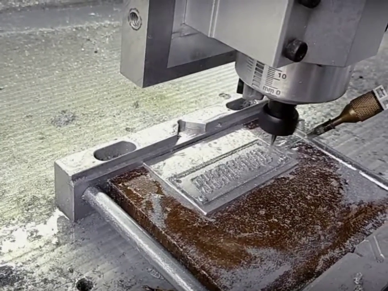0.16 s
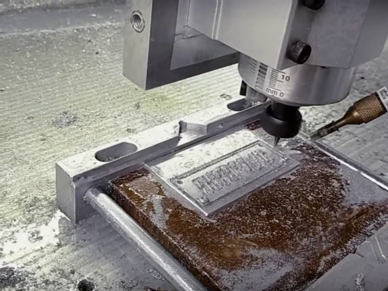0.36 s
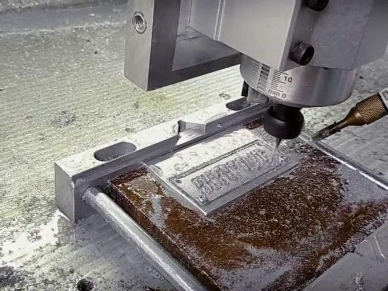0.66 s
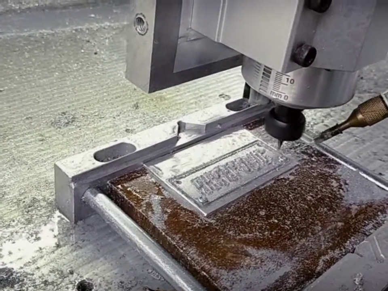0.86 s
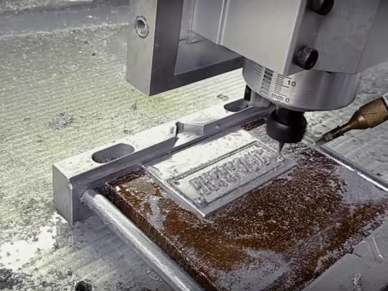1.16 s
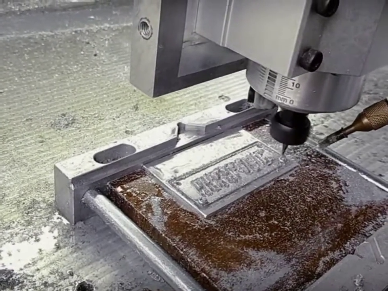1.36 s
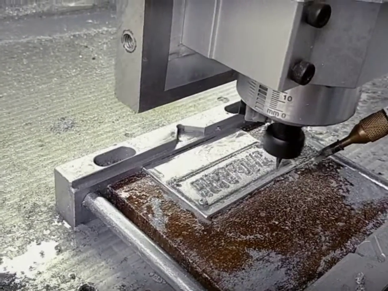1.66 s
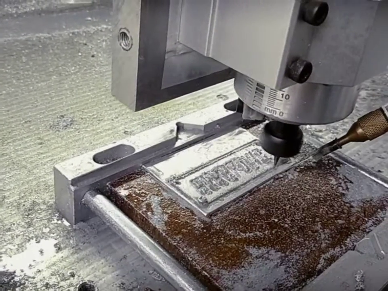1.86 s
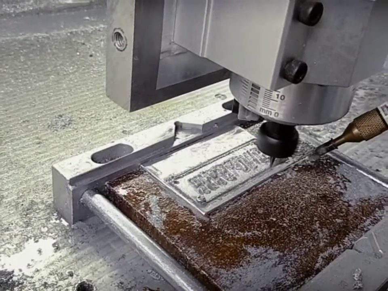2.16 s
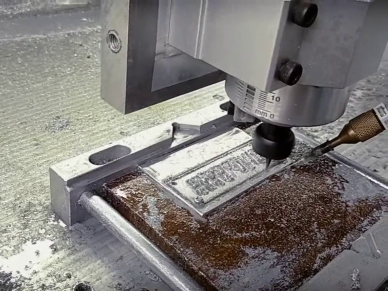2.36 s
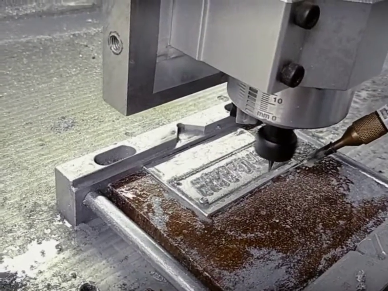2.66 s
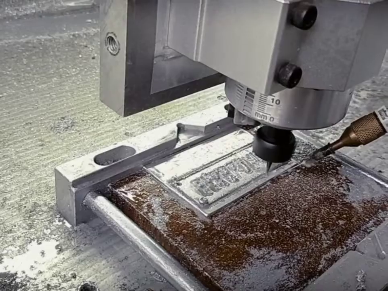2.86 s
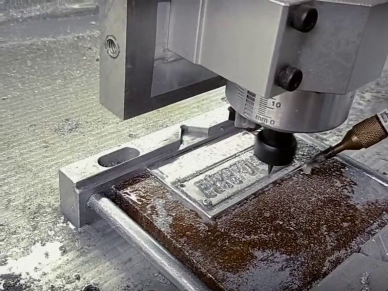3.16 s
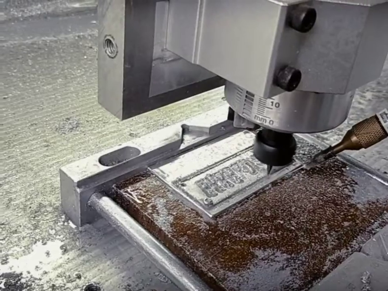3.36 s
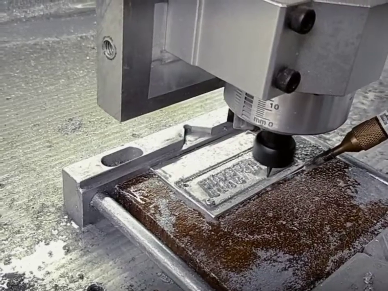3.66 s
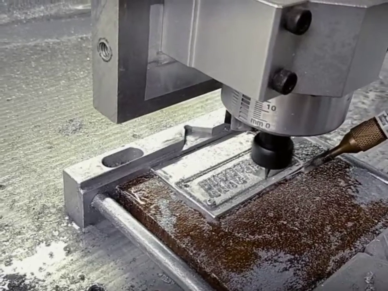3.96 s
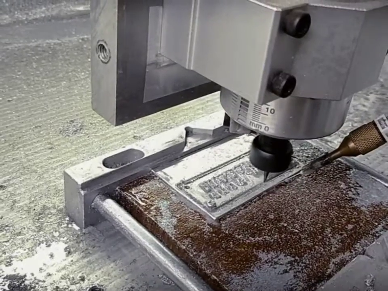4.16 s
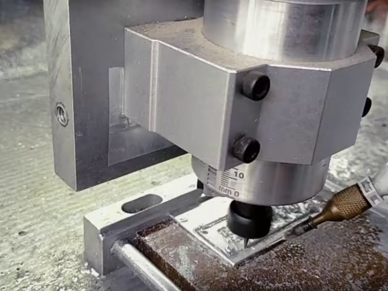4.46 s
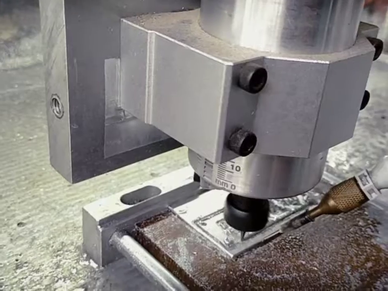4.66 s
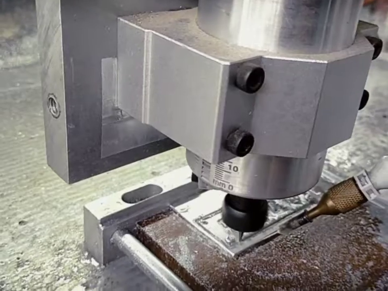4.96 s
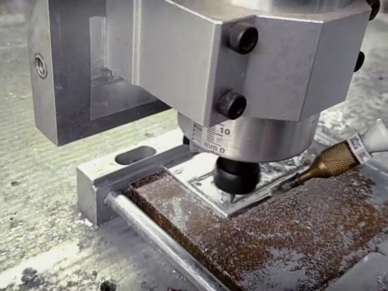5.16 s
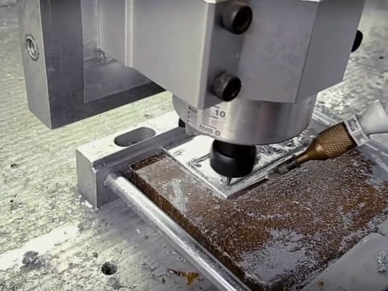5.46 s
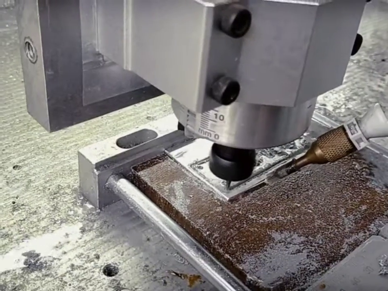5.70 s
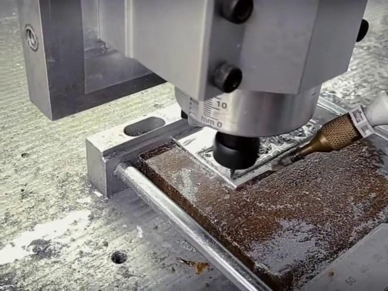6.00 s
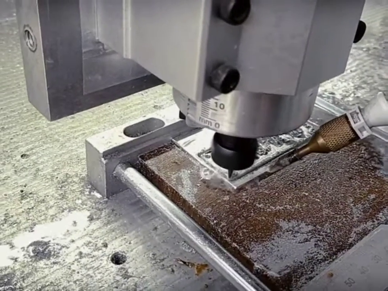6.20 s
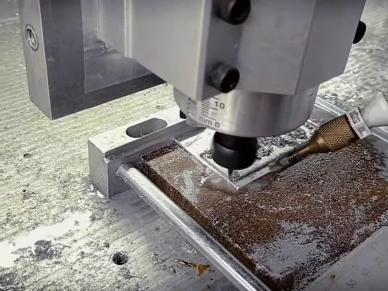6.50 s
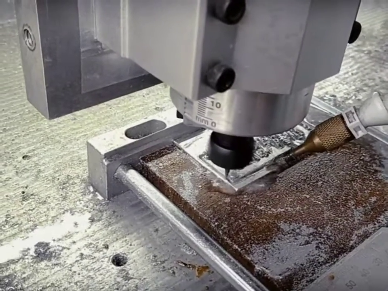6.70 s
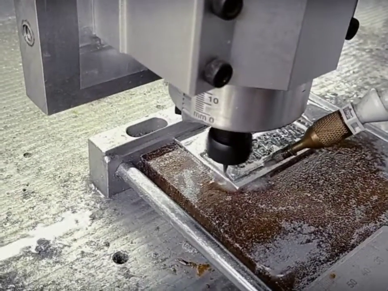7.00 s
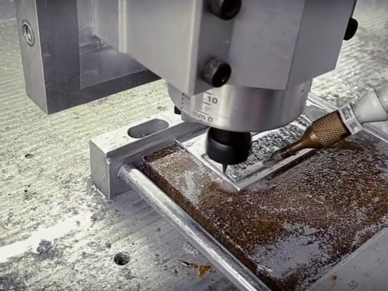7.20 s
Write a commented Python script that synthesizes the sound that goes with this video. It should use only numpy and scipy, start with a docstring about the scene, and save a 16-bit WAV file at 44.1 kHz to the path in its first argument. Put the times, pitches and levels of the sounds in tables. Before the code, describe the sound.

A small milling spindle whines at high speed while its cutter rasps into a metal plate and a mist nozzle hisses with a fast flutter. The whine changes tone a few times and rises briefly about halfway through. Then the microphone is suddenly closer, and the cutter scrapes and sizzles for about a second. Near the end the hiss thins and the whine settles slightly higher.

```python
"""A small CNC spindle engraves a metal plate, whining at about 429 turns a second. The cut rasps in the
machine frame, three strokes a second, and a mist nozzle hisses with a fast throb over a faint rumble.
At 1.7 s the listening position jumps and the whine changes colour. Near 3.8 s the tool lifts briefly: the
whine speeds up and changes colour with the load. At 4.5 s we jump closer and it changes again; for about
a second the cutter scrapes and sizzles. Near 6.1 s the load eases, giving a last, slightly higher whine."""
import sys
import numpy as np
from scipy import signal
from scipy.fft import rfft, irfft
from scipy.io import wavfile

SR = 44100
rng = np.random.default_rng(int(sys.argv[2]) if len(sys.argv) > 2 else 0)


def to_wav(s):
    """Save 16-bit WAV."""
    ch = np.atleast_2d(s).T  # columns
    pcm = np.round(np.clip(ch, -1, 1) * 32767)  # PCM
    wavfile.write(sys.argv[1], SR, pcm.astype(np.int16))


N = 323694
TIME, FREQ = np.arange(N) / SR, np.fft.rfftfreq(N, 1 / SR)
MOVE_CLOSER_S = 4.515

# The whine's five colours. Harmonic k is a tone at k times the turning speed: harmonic, level_db
BRIGHT_WHINE = [(1, -47.5), (2, -46.5), (3, -50), (4, -43), (5, -48), (6, -47.5), (7, -45), (8, -36.5),
                (9, -40), (10, -48), (11, -51), (12, -58.5), (13, -62), (14, -52.5), (15, -61.0),
                (16, -53.5), (17, -56), (18, -60), (19, -56), (20, -58)]
HOLLOW_WHINE = [(1, -46), (2, -55), (3, -38.5), (4, -47.5), (5, -52), (6, -51.5), (7, -46), (8, -45.5),
                (9, -40), (10, -48.5), (11, -53), (12, -59.5), (14, -54.5), (15, -60), (16, -49), (17, -58)]
RINGING_WHINE = [(1, -47.5), (2, -55), (3, -36), (4, -49.5), (5, -51), (6, -50), (7, -50.5), (8, -45.5),
                 (9, -40), (10, -44), (11, -62), (12, -65), (13, -59.9), (14, -53.5), (15, -54),
                 (16, -46.5), (17, -49)]
CLOSE_WHINE = [(1, -41.5), (2, -50), (3, -41), (4, -42), (5, -37.5), (6, -41.5), (7, -42), (8, -50.5),
               (9, -56.5), (10, -55.2), (11, -59.5), (12, -59.5), (13, -62), (14, -57.5), (15, -60.5),
               (16, -60), (17, -60)]
EASED_WHINE = [(1, -43.5), (2, -45), (3, -40.5), (4, -48), (5, -43), (6, -36.5), (7, -38.5), (8, -46),
               (9, -50), (10, -63.1), (11, -68), (12, -60), (13, -56.5), (14, -58), (15, -65.4),
               (16, -52.5), (17, -60)]
# Stretches of the sound, one per colour: start_s, fade_s, loudest_tone_growth_db_per_s, air_jet_db
SOUND_STRETCHES = [(0, .01, -1, -45.5), (1.685, .03, 1.2, -43.5), (3.79, 0.028, -1.5, -42),
                   (4.515, 0.0061, 1.5, -43.5), (6.1, 0.2, 0, -45)]
# Single tones swell or sink for a moment: middle_s, half_length_s, harmonic, change_db
TONE_SWELLS = [(0.1, 0.22, 5, 3.5), (0.2, 0.57, 10, -4), (1.25, 0.41, 7, 4.5), (1.585, 0.2, 6, 5),
               (1.7, 0.49, 10, 5), (4.64, 0.048, 4, 8.5), (4.7, .2, 6, -4), (4.8, .1, 4, -5),
               (5.125, 0.019, 4, 4), (5.31, 0.037, 4, 3), (5.455, 0.035, 4, 5.5), (6.237, 0.095, 5, -7),
               (6.336, 0.048, 6, 3.5), (6.762, 0.34, 5, 5.5)]
# How the whine changes while the tool is lifted: harmonic, change_db
LIFT_CHANGES = [(1, -6), (5, 10.5), (7, -6), (8, 5), (9, -8)]


def whine_gains(stroke, stroke_db=0.26, follow=0.27, lift_s=3.87, lift_half_s=0.08):
    """How strong each tone is over time, as the listening position jumps and the load changes."""
    colours = [BRIGHT_WHINE, HOLLOW_WHINE, RINGING_WHINE, CLOSE_WHINE, EASED_WHINE]
    gains = {}
    for share, (_, _, growth, _), tones in zip(stretch_shares(), SOUND_STRETCHES, colours):
        loudest_db = max(db for _, db in tones)
        middle_s = np.average(TIME, weights=share)
        swell_db = stroke_db * stroke + growth * (TIME - middle_s)
        for k, db in tones:
            part = 1 if db == loudest_db else follow  # the loudest tone swells fully, the rest in part
            gains[round(k)] = gains.get(round(k), 0) + share * amp(db + part * swell_db)
    for k in range(23, 36):  # faint high tones that run on into the hiss
        gains[k] = amp(-66.5)
    lift = [(lift_s, lift_half_s, k, db) for k, db in LIFT_CHANGES]
    for middle_s, half_s, k, db in TONE_SWELLS + lift:
        gains[round(k)] *= amp(db * bump(middle_s, half_s))
    gains[6] *= amp(1.7 * np.cos(2 * np.pi * 5.1 * TIME))  # the sixth tone beats slowly
    return gains


def whine(angle, stroke, waver_db=2.11, flutter=0.13, smear=0.22, ripple=0.091):
    """The spindle gives one pulse a turn, heard as a stack of tones that each waver on their own."""
    mains = 2 * np.pi * 100 * TIME  # mains power makes the motor push unevenly, adding side tones
    angle = angle + 0.0043 * np.sin(mains)
    sound = np.zeros(N)
    for k, gain in whine_gains(stroke).items():
        unrest = 1 - np.exp(-k / 2)  # the lowest tone, from the off-balance shaft, is the steadiest
        frame_boost = 1 + 0.69 * np.exp(-((k - 3.5) / 2) ** 2)  # more flutter where the frame rings
        shake = unrest * flutter * frame_boost
        phase = k * angle + shake * wander(45) + rng.uniform(-0.77, 0.83)
        phase -= smear * k ** 2  # the frame smears the pulse
        tone = (1 + shake * wander(45)) * np.cos(phase)
        side_tone = ripple * np.cos(phase + mains)
        looseness = 1 / (1 + (gain / amp(-38.5)) ** 2)  # strong tones waver less
        waver = amp(unrest * looseness * waver_db * wander(9))
        sound += gain * waver * (tone + side_tone)
    return np.sqrt(2) * sound


# The load drops and the spindle races for a moment: peak_s, extra_speed_hz
SPEED_SURGES = [(3.846, 8.7), (4.45, 2), (6.14, 5.7)]


def spindle_speed(cutting_hz=428.7, eased_hz=431.5, ease_s=6.33, rise_s=0.0692, settle_s=0.075):
    """Turns a second. The speed control drifts a little around its target and pulls each surge back."""
    speed = cutting_hz + (eased_hz - cutting_hz) * after(ease_s, 0.11)
    for peak_s, extra_hz in SPEED_SURGES:
        rise = np.clip(1 + (TIME - peak_s) / rise_s, 0, 1)
        settle = np.exp(-np.maximum(TIME - peak_s, 0) / settle_s)
        speed += extra_hz * rise * settle
    return speed + 0.443 * wander(12)


# Colour of the cut and its cooling air, from further off and from close by: pitch_hz, relative_db
FAR_RASP_COLOUR = [(35, -88.5), (115, -94), (285, -91.5), (395, -85.5), (705, -81.5), (1005, -72),
                   (1235, -65.5), (1605, -75.5), (2005, -74), (2355, -73.5), (3155, -79.5), (4005, -74.5),
                   (5005, -85), (6505, -91)]
NEAR_RASP_COLOUR = [(35, -87), (115, -92.5), (285, -92), (395, -89.5), (705, -81.5), (1005, -71),
                    (1235, -66.5), (1605, -73.5), (2005, -75), (2355, -67), (2905, -74), (3605, -79),
                    (4505, -88), (6505, -94)]
# Pitches at which the frame and the plate ring: pitch_hz, width_hz, boost_db
FRAME_RINGS = [(525, 30.6, 13.5), (1544, 30, 5.5), (1778, 97, 5.5), (2274, 56, 2), (2660, 84, 0)]


def rasp(angle, throb, stroke, bite=0.18, pulsing=0.17, stroke_db=0.2):
    """The edge bites once a turn; its noise throbs, swells with each stroke and rings in the frame."""
    ringing = amp(sum(db * ring_shape(hz, width_hz) for hz, width_hz, db in FRAME_RINGS))
    noise = rng.standard_normal(N) * np.sqrt(SR / 2)
    scrape = noise * (1 + bite * np.cos(angle)) * (1 + pulsing * throb)
    far = amp(-1.0) * coloured(scrape, spectrum(FAR_RASP_COLOUR) * ringing)
    near = amp(-0.57) * coloured(scrape, spectrum(NEAR_RASP_COLOUR) * ringing)
    closeness = after(MOVE_CLOSER_S)
    return ((1 - closeness) * far + closeness * near) * amp(stroke_db * stroke)


# Colour of the nozzle's spray and of its higher air jet: pitch_hz, relative_db
SPRAY_HISS = [(3050, -25), (4520, -9.5), (5520, -5.5), (6620, -6.5), (7450, -1.5), (8230, 1.5),
              (8750, -6.5), (9300, -10.5), (11050, -17.5), (13050, -41)]
JET_HISS = [(7050, -34), (9650, -16), (11050, -9.5), (12900, -5.5), (13450, -2), (14200, 0.5), (15050, 0.5),
            (15650, -4)]


def mist(angle, throb, stroke, pulsing=0.14, chop=0.073, sputter_db=1.35, stroke_db=0.1):
    """Spray and air jet throb with the air supply, sputter, and are chopped by the turning tool."""
    flow = (1 + pulsing * throb) * (1 + chop * np.cos(angle))
    flow *= amp(sputter_db * wander(60) + stroke_db * stroke)
    spray_db = -43 + 0.78 * wander(8)  # small gusts
    spray_db -= 4 * after(MOVE_CLOSER_S)  # from close by the spray is shielded
    spray_db -= 4.5 * after(5.92, 0.076)  # then it thins
    jet_db = sum(share * db for share, (_, _, _, db) in zip(stretch_shares(), SOUND_STRETCHES))
    spray = coloured_noise(spectrum(SPRAY_HISS)) * amp(spray_db)
    jet = coloured_noise(spectrum(JET_HISS)) * amp(jet_db)
    return flow * (spray + jet)


# Colour of the cutter's sizzle: pitch_hz, relative_db
SIZZLE_COLOUR = [(4550, -29), (5750, -1), (6850, -11), (7950, -1), (9750, -27), (11250, 1), (12050, -2),
                 (12750, -13), (15950, -27)]
# Moments when the cutter grabs the metal: start_s, length_s, level_db
GRABS = [(5.135, 0.069, -43.5), (5.215, .08, -43.5), (5.348, 0.055, -44), (5.487, .06, -44),
         (5.57, .055, -44.5), (5.652, .035, -47), (5.742, 0.026, -42.5), (5.793, .022, -43)]


def sizzle(turn_hz=428.7, memory=0.62, fade_s=0.013, uneven_db=3.0):
    """The edge recuts the marks of its last turn, so its noise gathers round the whine's harmonics."""
    recut = 1 / abs(1 - memory * np.exp(-2j * np.pi * FREQ / turn_hz))
    grit = coloured_noise(spectrum(SIZZLE_COLOUR) * recut)
    grit = normalised(grit * amp(uneven_db * wander(50)))
    bursts = sum(amp(db) * (after(start_s, fade_s) - after(start_s + length_s, fade_s))
                 for start_s, length_s, db in GRABS)
    scrape = coloured_noise(ring_shape(pitch_hz=7920, width_hz=790) * recut)
    scrape = normalised(scrape * amp(uneven_db * wander(14)))
    scrape_gain = amp(-50.5) * (after(4.62) - after(5.92))  # lighter scraping around the grabs
    return grit * bursts + scrape * scrape_gain


def scuff():
    """A short rasp as the tool meets the plate after its lift."""
    noise = coloured_noise(ring_shape(pitch_hz=3750, width_hz=350))
    return amp(-38) * bump(middle_s=3.897, half_s=0.012) * noise


# How strongly the machine shudders: time_s, level_db
SHUDDER_LEVELS = [(0, -78), (4.3, -82), (4.95, -72), (5.75, -61), (6.04, -71), (6.38, -57), (6.62, -69),
                  (7.3, -74)]
# Brief low drones: middle_s, half_length_s, level_db
LOW_DRONES = [(0.176, 0.17, -67.5), (6.324, .15, -62.5)]


def rumble(cutoff_hz=70):
    """The moving machine gives a faint low shudder, and two brief drones are heard."""
    shudder = coloured_noise(1 / (1 + (FREQ / cutoff_hz) ** 4))
    shudder_gain = amp(np.interp(TIME, *np.transpose(SHUDDER_LEVELS)))
    drone = coloured_noise(ring_shape(pitch_hz=200, width_hz=56))
    drone_gain = sum(amp(db) * bump(middle_s, half_s) for middle_s, half_s, db in LOW_DRONES)
    return shudder * shudder_gain + drone * drone_gain


def stretch_shares():
    """How much of each stretch is heard at every moment; the shares add up to 1."""
    begun = [after(start_s, fade_s) for start_s, fade_s, _, _ in SOUND_STRETCHES[1:]]
    return -np.diff([np.ones(N), *begun, np.zeros(N)], axis=0)


def amp(db):
    """Turns decibels into a gain, a number to multiply by."""
    return 10 ** (np.asarray(db) / 20)


def normalised(x):
    """Scales a signal to an average strength (rms) of 1."""
    return x / np.sqrt(np.mean(x ** 2) + 1e-20)


def spectrum(points):
    """A gain for every pitch, drawn through rows of pitch_hz, relative_db."""
    hz, db = np.transpose(points)
    return amp(np.interp(np.log(FREQ + 1), np.log(hz), db))


def ring_shape(pitch_hz, width_hz):
    """A peak of height 1 around one pitch."""
    return 1 / (1 + (2 * (FREQ - pitch_hz) / width_hz) ** 2)


def coloured(x, gain):
    """Filters a signal with a gain for every pitch."""
    return irfft(rfft(x) * gain, N)


def coloured_noise(gain):
    """Filtered noise of strength 1."""
    return normalised(coloured(rng.standard_normal(N), gain))


def wander(hz):
    """A random drift of strength 1, with up to about hz wiggles a second."""
    points = rng.standard_normal(int(2 * hz * N / SR) + 4)
    return normalised(np.interp(TIME * 2 * hz + rng.random(), np.arange(len(points)), points))


def after(time_s, fade_s=0.012):
    """Rises from 0 to 1 around time_s."""
    return np.clip(0.5 + (TIME - time_s) / fade_s, 0, 1)


def bump(middle_s, half_s):
    """Swells smoothly to 1 at middle_s and fades again."""
    return np.exp(-((TIME - middle_s) / half_s) ** 2)


def scene():
    """One turning spindle and one stroke rhythm drive whine, rasp and mist; both channels are alike."""
    angle = 2 * np.pi * np.cumsum(spindle_speed()) / SR
    stroke = np.cos(2 * np.pi * 3.0 * (TIME - 0.185))  # the first stroke peaks at 0.185 s
    throb = np.cos(2 * np.pi * 43.06 * TIME)  # the air supply pulses
    sound = whine(angle, stroke) + rasp(angle, throb, stroke) + mist(angle, throb, stroke)
    sound += sizzle() + scuff() + rumble()
    return np.array([sound, sound])


def record(dry):
    """Cuts off the very highest treble, above 15750 Hz."""
    low_pass = signal.firwin(801, 15750, window=("kaiser", 9), fs=SR)
    return signal.oaconvolve(dry, low_pass[None], "same")


dry = scene()
out = record(dry)
to_wav(out)
```